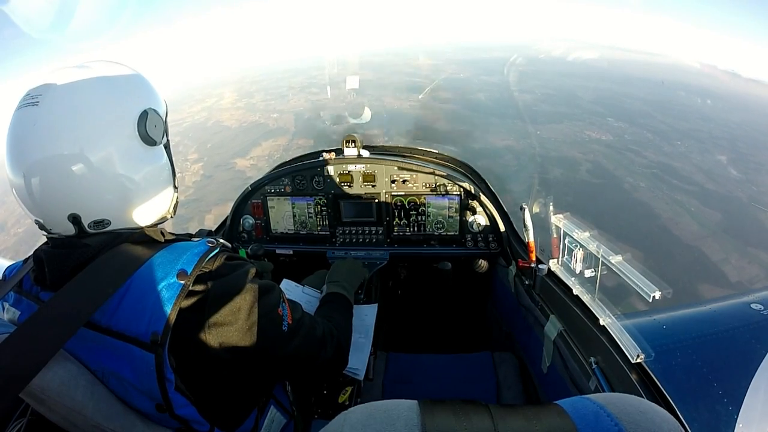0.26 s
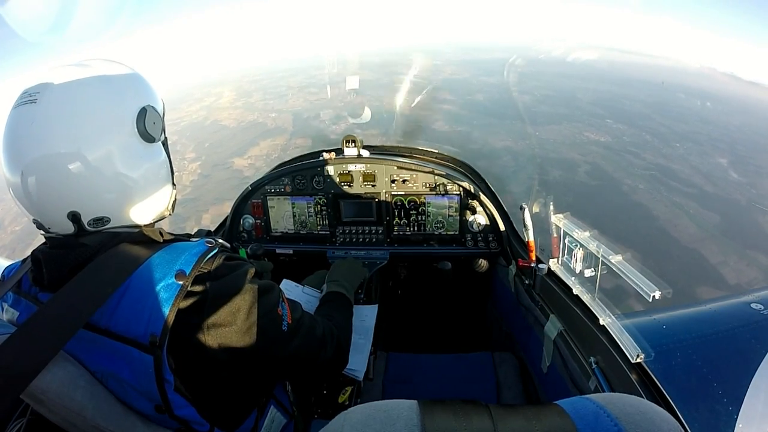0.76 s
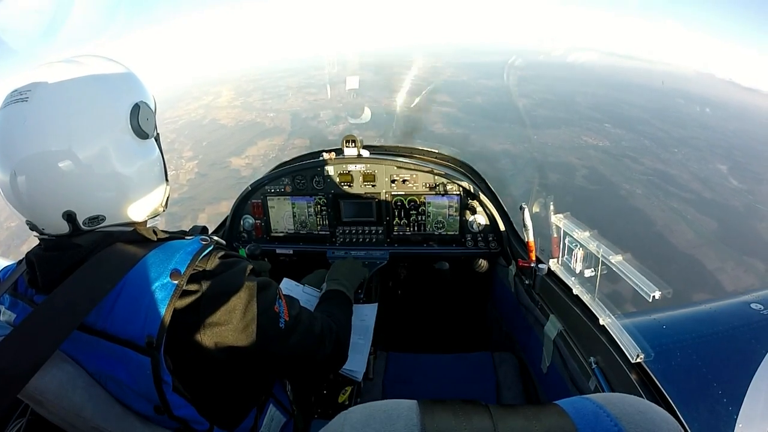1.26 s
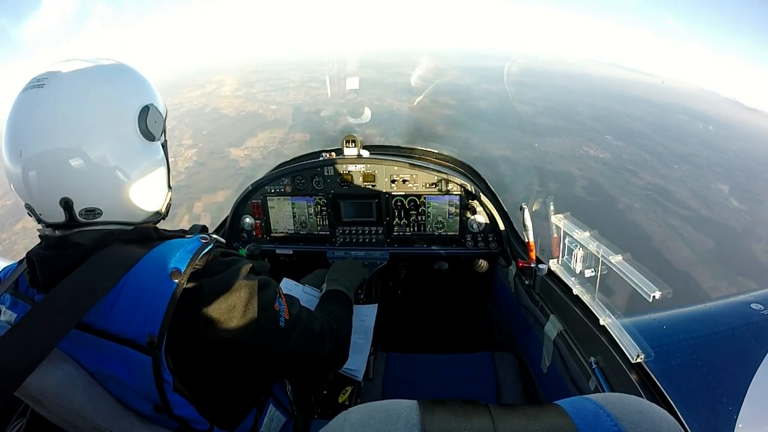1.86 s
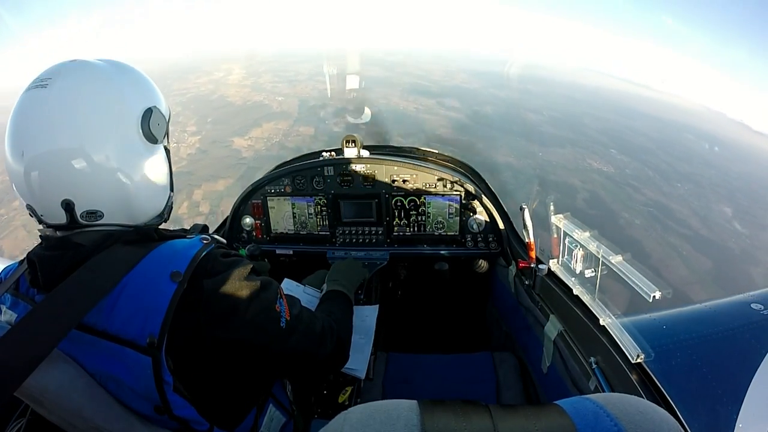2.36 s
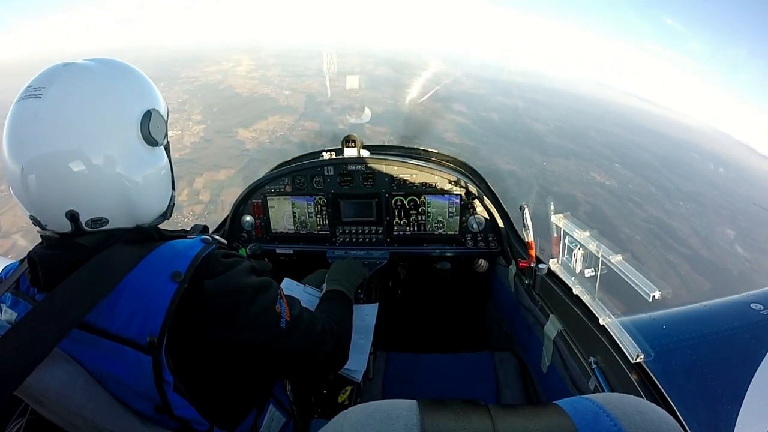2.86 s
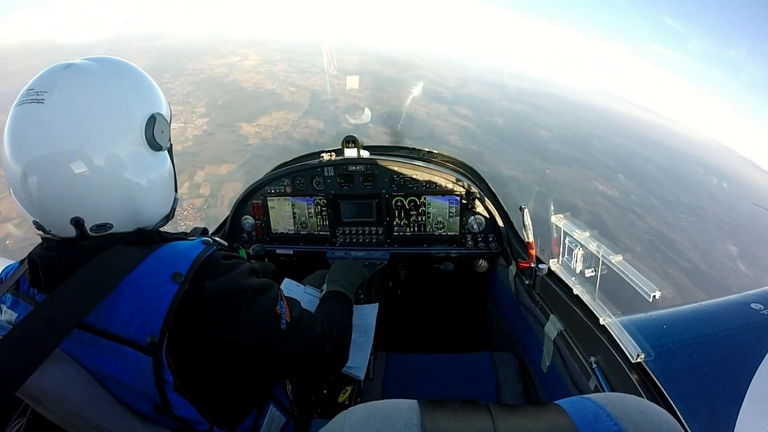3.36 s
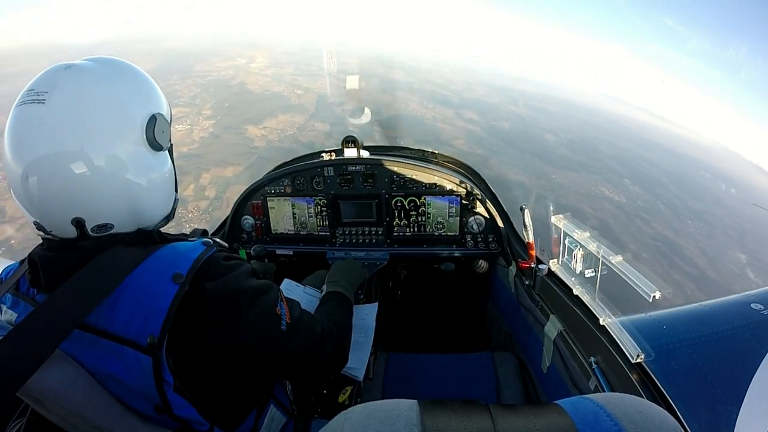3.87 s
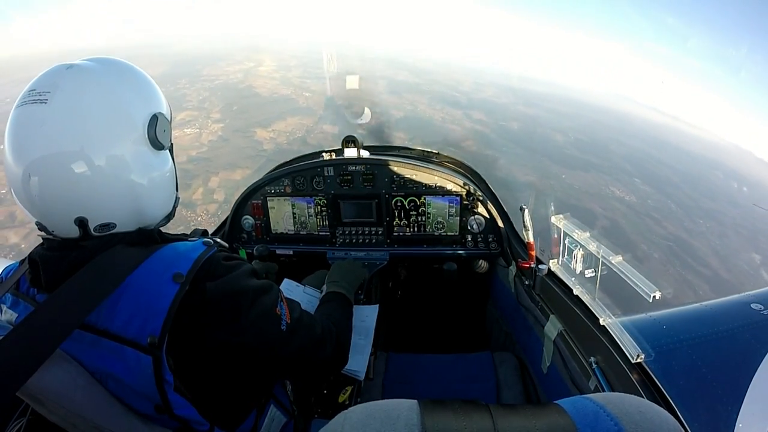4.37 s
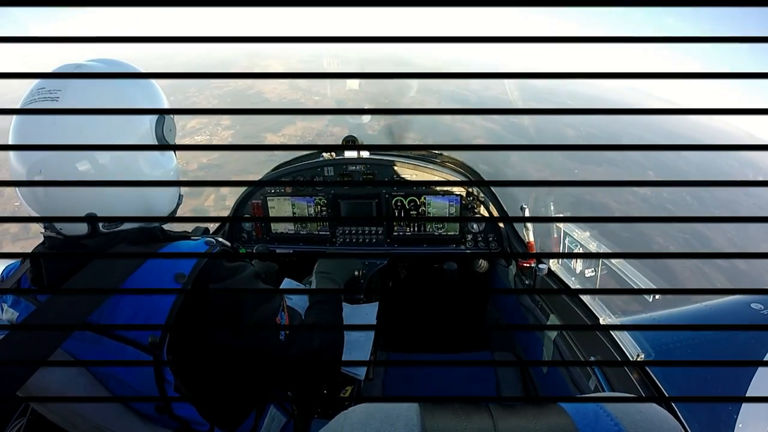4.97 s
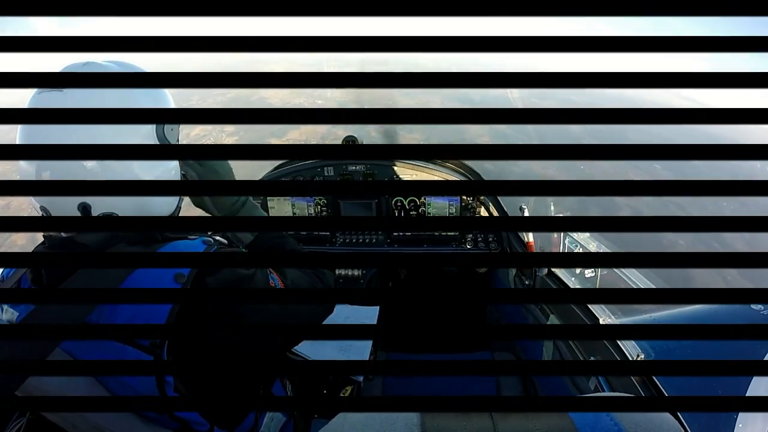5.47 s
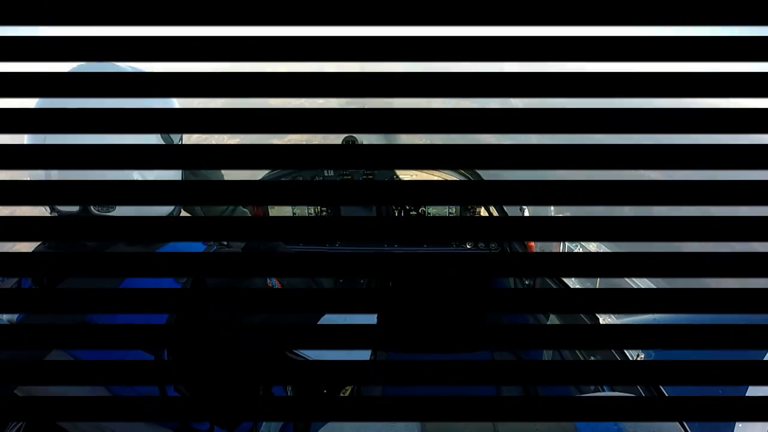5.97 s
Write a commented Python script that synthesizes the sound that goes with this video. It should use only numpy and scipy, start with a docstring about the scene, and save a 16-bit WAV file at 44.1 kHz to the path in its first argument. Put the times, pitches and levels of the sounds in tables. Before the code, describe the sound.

Low propeller drone and booming cabin rumble beneath hissing, buffeting airflow in a small closed cockpit, dying away over the last second.

```python
"""Light aircraft cockpit in flight

Close interior of a light aircraft, from a microphone behind the seats, with the canopy shut.
Slipstream is coloured noise rushing and hissing over the canopy in gusts; the cabin's air modes are noise
in narrow bands that boom with those gusts. A geared four-cylinder engine and its three-blade propeller
drone as sine partials locked to their shafts. The sound is faded out over the last second."""
import sys
import numpy as np
from scipy import signal
from scipy.fft import rfft, irfft
from scipy.io import wavfile
from scipy.ndimage import uniform_filter1d

SR = 44100
rng = np.random.default_rng(int(sys.argv[2]) if len(sys.argv) > 2 else 0)


def transcribe(u):
    """Save the signal u as a 16-bit wav file named by the first command-line argument.

    u: samples, shape (n,) or (channels, n), limited to [-1, 1]; the rate is SR.
    q: integer samples, one column per channel.
    """
    v = np.clip(np.atleast_2d(u).T, -1, 1)
    q = np.round(v * 32767).astype(np.int16)
    wavfile.write(sys.argv[1], SR, q)


N = 274690
TIME = np.arange(N) / SR  # s
FREQS = np.maximum(np.arange(N // 2 + 1) * SR / N, 1e-3)  # Hz, kept above zero for the logarithm

# Level of the airflow between the gusts, with the fade-out over the last second.
# Each row: time in seconds, level in dB.
AIRFLOW_CURVE = [(0, -43), (1.9, -42), (2.55, -43.5), (3.6, -41.5), (4.7, -43.5), (5.35, -44.5),
                 (5.72, -46.5), (5.87, -52), (6.23, -55)]
# Gusts. Each row: peak in seconds, length at half strength in seconds, rise of the rush in dB,
# rise of the cabin boom in dB.
GUST_EVENTS = [(0.05, 0.17, 6, 8), (0.32, 0.086, 3.5, 2.5), (0.46, 0.094, 5.5, 4), (0.601, 0.083, 6.5, 8),
               (0.7, 0.044, 4, 8), (0.819, 0.11, 3, 3), (1.03, 0.051, 4, 2.5), (1.12, 0.12, 3.5, 7),
               (1.33, .08, 4, 4.5), (1.45, 0.1, 3, 0), (1.56, 0.041, 2, 7.5), (1.66, 0.13, 4, 5),
               (1.778, 0.084, 5.5, 7), (1.96, 0.11, 6, 7), (2.13, .1, 4, 12), (2.47, 0.11, 2.5, 5.5),
               (2.8, .14, 3, 4), (3.089, 0.056, 6.5, 12), (3.39, 0.11, 2.5, 16.5), (3.47, 0.07, 3, 0.5),
               (3.62, .16, 6.5, 10.5), (3.73, 0.09, 3.5, 2.5), (3.86, .07, 4, 5.5), (3.94, 0.068, 4.5, 12),
               (4.15, 0.084, 4, 11), (4.37, .1, 5, 2.5), (4.629, 0.065, 4.5, 1.5), (4.86, .12, 4.5, 5),
               (5.1, 0.049, 1, 10.5), (5.5, 0.084, 5.5, 11), (5.95, 0.076, 3.5, 5)]
# Colour of the rush over the canopy. Each row: frequency in Hz, relative level in dB.
RUSH_COLOUR = [(20, -3.5), (40, 6.5), (100, 7), (250, 1.5), (390, 1), (700, -1.5), (920, 0), (1200, -3),
               (1750, -3), (2400, -5.5), (2750, -10), (3450, -12.5), (3900, -24), (6000, -65)]
# Colour of the hiss at the canopy seals. Each row: frequency in Hz, relative level in dB.
HISS_COLOUR = [(2500, -42.5), (3400, -2.5), (3900, 1), (4400, -1), (5500, 2), (6300, -0.5), (7000, -4.5),
               (8000, -11), (9500, -15.5), (11000, -17.5), (12600, -21), (13500, -19.5), (15000, -28)]
# Narrow resonances and nulls of canopy and cabin. Each row: centre in Hz, width in Hz, peak or null in dB.
CANOPY_RESONANCES = [(534, 19, -2.5), (632, 20, 3), (753, 7.4, 6), (778, 24, -6), (882, 89, 2),
                     (1005, 30, 6.5), (1045, 19, 5.5), (1063, 24, -4), (1608, 73, 3), (1788, 50, 5.5),
                     (1880, 110, -3.5), (2193, 120, 5), (2460, 83, 2.5), (3320, 130, 5.5), (4670, 210, 6.5),
                     (5950, 220, 3)]
# Higher air modes of the cabin. Each row: centre in Hz, width in Hz, relative level in dB.
CABIN_AIR_MODES = [(140.5, 21, 1), (157.8, 20, -7.5), (191, 30, -19.5), (217.4, 38, -22), (262, 25, -21),
                   (300, 36, -19.5), (339.2, 27, -20.5)]
# Lengthwise air modes of the fuselage. Each row: centre in Hz, width in Hz, relative level in dB.
FUSELAGE_MODES = [(66.4, 19, 3), (69, 28, -7.5), (83.5, 18, 0.5)]
# Propeller speed. Each row: time in seconds, turns per minute.
PROP_SPEED = [(0, 1461), (0.35, 1412), (0.8, 1429), (1.7, 1431), (2.3, 1454), (3.2, 1466), (4.2, 1478),
              (5.2, 1477), (6.23, 1475)]
# Propeller partials. Each row: multiple of the propeller turn, relative level in dB; 3 is the blade rate.
PROP_PARTIALS = [(1, -33.5), (2, -33), (3, 0.5), (6, -21), (9, -33)]
# Engine partials. Each row: multiple of the four-stroke cycle of two crank turns, relative level in dB;
# 4 is the firing rate.
ENGINE_PARTIALS = [(2, -5), (3, -5.5), (4, 1), (5, -9), (8, -23.5), (11, -22.5)]
# Strength of the drone before trims, with the fade-out over the last second.
# Each row: time in seconds, blade tone in dB, exhaust in dB.
DRONE_CURVE = [(0, -26, -25), (0.15, -21, -28), (1.9, -19, -28), (2.6, -18, -35.5), (4.6, -18.5, -37),
               (5.3, -21, -37.5), (6.23, -30, -52.5)]
# Moments when the low drone sinks briefly. Each row: centre in seconds, depth in dB.
DRONE_DIPS = [(0.28, 8), (0.67, 6), (0.97, 9), (1.31, 5.5), (1.63, 15), (1.75, 3), (1.9, 13), (3.06, 7),
              (3.58, 6.5), (5.43, 6)]

GUST_BUILD, DIP_BUILD = 0.63, 0.44  # share of the length spent before the peak
DIP_S = 0.05  # length of a dip at half depth
RUSH_DB, HISS_DB, BOOM_DB, BODY_DB, DEEP_DB = 2, -15.5, 6, -4.5, 11  # each against the airflow
HISS_FOLLOW, BODY_FOLLOW = 0.92, 1.05  # dB of hiss and of higher cabin modes per dB of gust
DEEP_FOLLOW = 0.4  # dB of fuselage modes per dB of smoothed cabin boom
EDDY_HZ = 22  # pace of the small, quick turbulence
RUSH_EDDY_DB, HISS_EDDY_DB, BOOM_EDDY_DB = 0.84, 0.9, 1.1  # spread the eddies give each layer
BOOM_BELOW_HZ = 175  # cabin modes below this boom, those above ring with the rush
SHAKE_DEEP_DB, SHAKE_BODY_DB = -5.5, -17  # exhaust shaking the modes, against the untrimmed exhaust
BLADE_TRIM_DB, EXHAUST_TRIM_DB = -0.5, -2.2
GEAR = 2.43  # crank turns per propeller turn
TOP_HZ = 14800  # upper limit of the recorder


def undb(db):
    """Decibels to gain."""
    return 10 ** (np.asarray(db) / 20)


def controls(table):
    """Each column of a curve table as one value a sample."""
    seconds, *columns = np.transpose(table)
    return [np.interp(TIME, seconds, column) for column in columns]


def noise(gain):
    """Noise of rms 1 with the given gain at each frequency."""
    shaped = irfft(rfft(rng.standard_normal(N)) * gain, N)
    return shaped / np.std(shaped)


def wander(rate_hz):
    """Slow chance of spread 1, with little motion faster than the rate."""
    return noise(1 / (1 + (FREQS / rate_hz) ** 2))


def swell(peak_s, length_s, build):
    """A smooth rise to 1 and fall, with its own half-strength time on either side of the peak."""
    side_s = length_s * np.where(TIME < peak_s, build, 1 - build)
    return 0.5 ** (((TIME - peak_s) / side_s) ** 2)


def colour(points):
    """Gain through a colour table, with the resonances and nulls of canopy and cabin on top."""
    hz, db = np.transpose(points)
    broad_db = np.interp(np.log(FREQS), np.log(hz), db)
    ripple_db = sum(peak_db / (1 + (2 * (FREQS - centre_hz) / width_hz) ** 2)
                    for centre_hz, width_hz, peak_db in CANOPY_RESONANCES)
    return undb(broad_db + ripple_db)


def resonate(modes):
    """Noise ringing in a set of air modes, their powers added."""
    power = sum(undb(db) ** 2 / (1 + (2 * (FREQS - hz) / width_hz) ** 2) ** 2
                for hz, width_hz, db in modes)
    return noise(np.sqrt(power))


def gusts():
    """The dB that the gusts add to the rush and to the cabin's boom."""
    rush_db = boom_db = 0
    for peak_s, length_s, rush_rise_db, boom_rise_db in GUST_EVENTS:
        shape = swell(peak_s, length_s, GUST_BUILD)
        rush_db = rush_db + rush_rise_db * shape
        boom_db = boom_db + boom_rise_db * shape
    return rush_db, boom_db


def slipstream(flow_db, gust_db, eddies):
    """Air rushes over the canopy and hisses at its seals; the same gusts and small eddies shake both."""
    rush_db = flow_db + gust_db + RUSH_EDDY_DB * eddies + RUSH_DB
    hiss_db = flow_db + HISS_FOLLOW * gust_db + HISS_EDDY_DB * eddies + HISS_DB
    rush = noise(colour(RUSH_COLOUR)) * undb(rush_db)
    hiss = noise(colour(HISS_COLOUR)) * undb(hiss_db)
    return rush + hiss


def boom(flow_db, gust_db, buffet_db, exhaust_db, eddies):
    """The cabin's lower modes boom in some gusts; the higher ones rise with the rush and the exhaust."""
    low_modes = [mode for mode in CABIN_AIR_MODES if mode[0] < BOOM_BELOW_HZ]
    high_modes = [mode for mode in CABIN_AIR_MODES if mode[0] >= BOOM_BELOW_HZ]
    low = resonate(low_modes) * undb(flow_db + buffet_db + BOOM_DB)
    air_drive = undb(flow_db + BODY_FOLLOW * gust_db + BODY_DB)
    exhaust_drive = undb(exhaust_db + SHAKE_BODY_DB)
    high = resonate(high_modes) * np.hypot(air_drive, exhaust_drive)
    return (low + high) * undb(BOOM_EDDY_DB * eddies)


def rumble(flow_db, buffet_db, exhaust_db, dip_db):
    """Turbulence, smoothed over a quarter second, and exhaust drive the fuselage's deepest modes."""
    lazy_db = uniform_filter1d(buffet_db, size=SR // 4)
    air_drive = undb(flow_db + DEEP_FOLLOW * lazy_db + DEEP_DB)
    exhaust_drive = undb(exhaust_db + SHAKE_DEEP_DB)
    ringing = resonate(FUSELAGE_MODES) * np.hypot(air_drive, exhaust_drive)
    return ringing * undb(-dip_db / 2)  # sinks half as far as the blade tone


def dips():
    """The dB by which the blade tone sinks in its brief dips."""
    return sum(depth_db * swell(centre_s, DIP_S, DIP_BUILD) for centre_s, depth_db in DRONE_DIPS)


def partials(turn_hz, orders, flutter, flutter_hz):
    """Partials locked to a shaft; each flutters a little in strength and phase."""
    angle = 2 * np.pi * np.cumsum(turn_hz) / SR
    total = 0
    for order, db in orders:
        phase = order * angle + rng.uniform(0, 2 * np.pi)
        in_step = (1 + flutter * wander(flutter_hz)) * np.sin(phase)
        quarter_turn = flutter * wander(flutter_hz) * np.cos(phase)
        total = total + undb(db) * (in_step + quarter_turn)
    return np.sqrt(2) * total  # a steady partial at 0 dB has rms 1


def powerplant(blade_db, exhaust_db, dip_db):
    """Blade passes and firings, tied by the gearbox; the cabin lets only their lowest partials in."""
    prop_hz = controls(PROP_SPEED)[0] / 60
    cycle_hz = prop_hz * GEAR / 2
    blades = partials(prop_hz, PROP_PARTIALS, flutter=0.07, flutter_hz=12)
    exhaust = partials(cycle_hz, ENGINE_PARTIALS, flutter=0.23, flutter_hz=8.4)
    return blades * undb(blade_db - dip_db + BLADE_TRIM_DB) + exhaust * undb(exhaust_db + EXHAUST_TRIM_DB)


def scene():
    """Airflow, boom and drone at a microphone behind the seats."""
    flow_db = controls(AIRFLOW_CURVE)[0]
    blade_db, exhaust_db = controls(DRONE_CURVE)
    gust_db, buffet_db = gusts()
    eddies = wander(EDDY_HZ)
    dip_db = dips()
    air = slipstream(flow_db, gust_db, eddies)
    cabin = boom(flow_db, gust_db, buffet_db, exhaust_db, eddies)
    fuselage = rumble(flow_db, buffet_db, exhaust_db, dip_db)
    drone = powerplant(blade_db, exhaust_db, dip_db)
    return (air + cabin + fuselage + drone)[None]  # one channel


def record(dry):
    """A fade-in of 8 ms starts without a click; the recorder drops the deepest rumble and cuts the top."""
    faded_in = dry * np.sin(np.pi / 2 * np.minimum(TIME / 0.008, 1)) ** 2
    low_cut = signal.butter(4, 19, "highpass", fs=SR, output="sos")
    top_cut = signal.ellip(8, 0.2, 70, TOP_HZ, fs=SR, output="sos")
    return signal.sosfilt(top_cut, signal.sosfilt(low_cut, faded_in))


dry = scene()
out = record(dry)
transcribe(out)
```